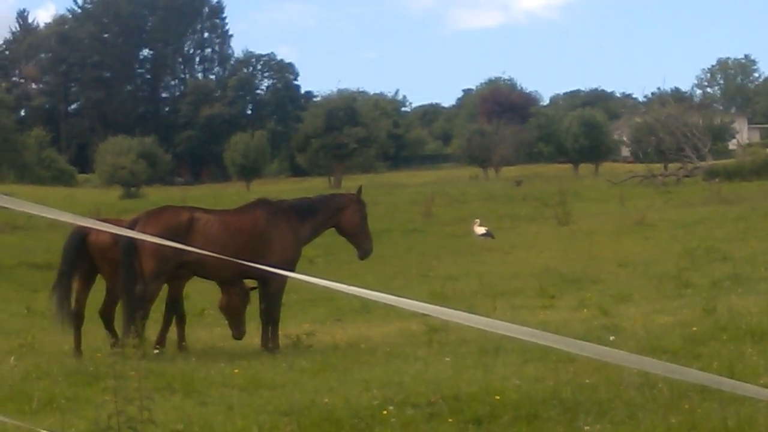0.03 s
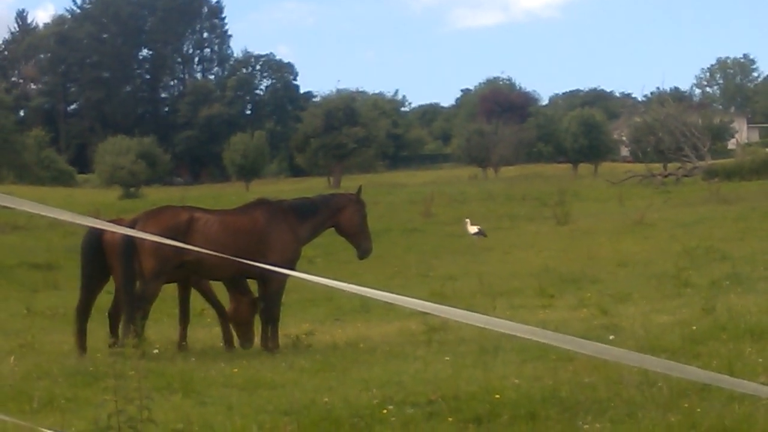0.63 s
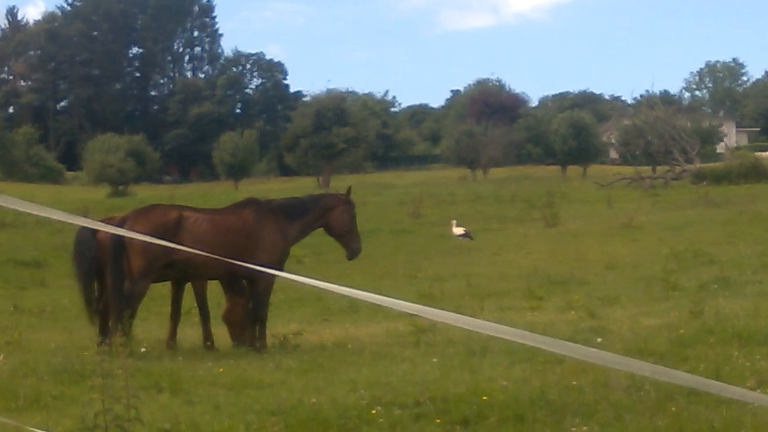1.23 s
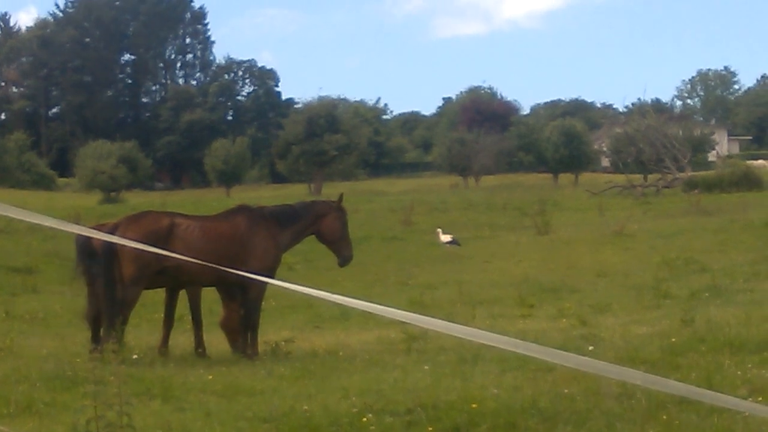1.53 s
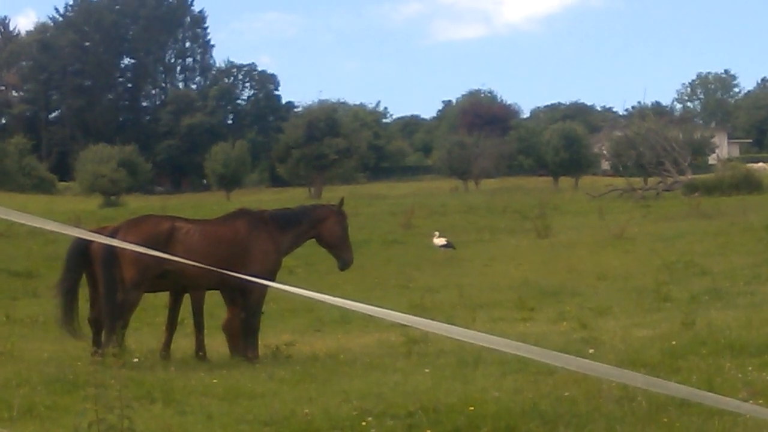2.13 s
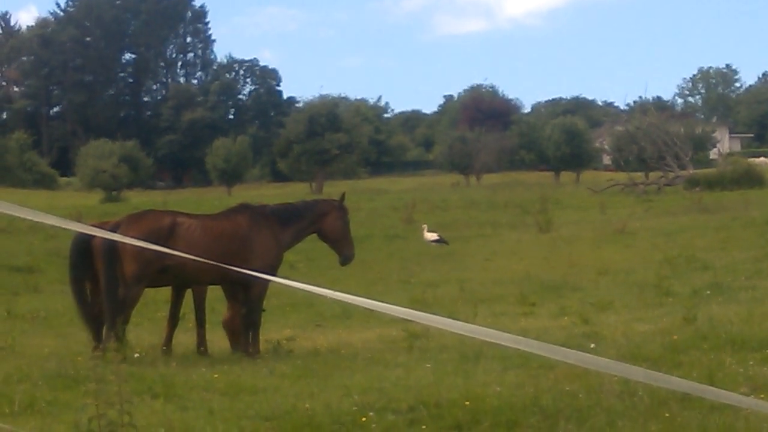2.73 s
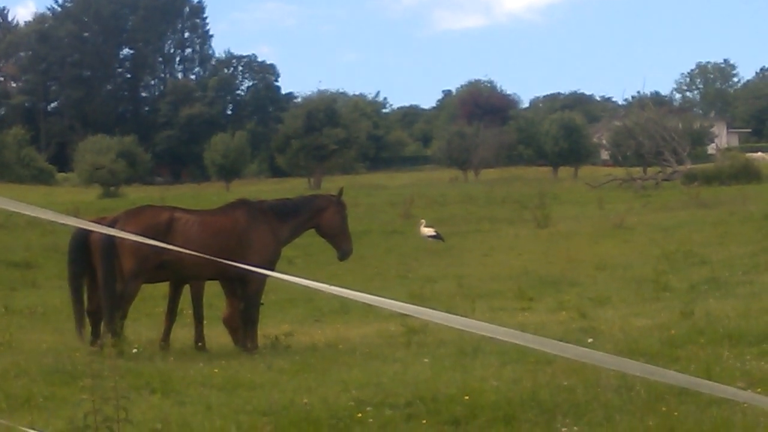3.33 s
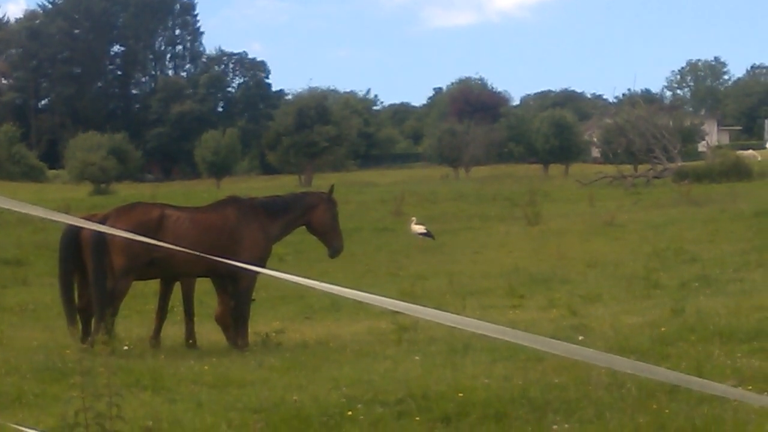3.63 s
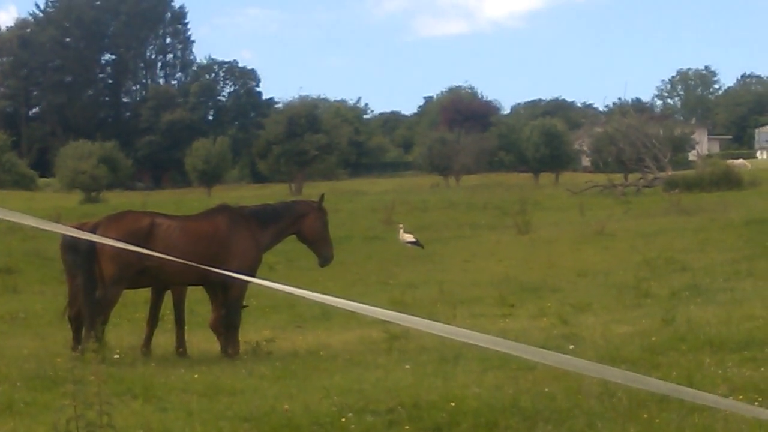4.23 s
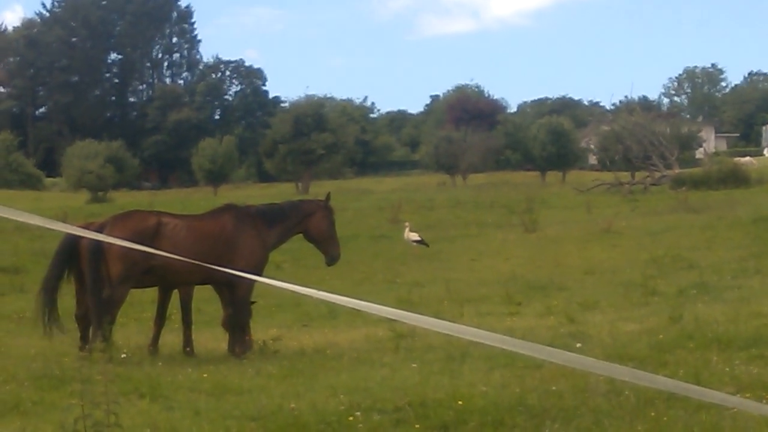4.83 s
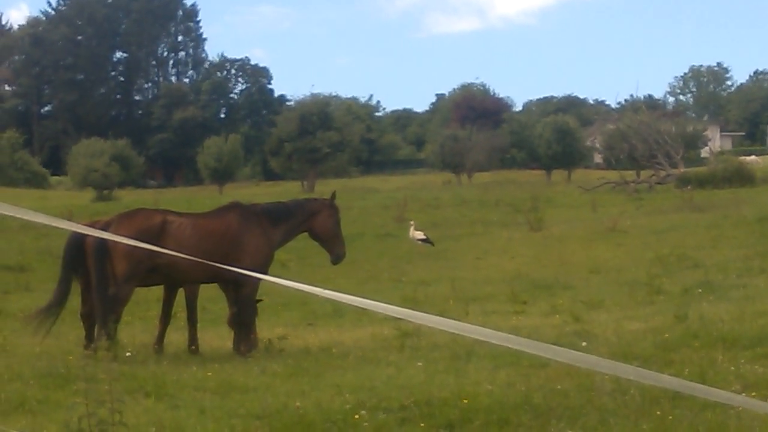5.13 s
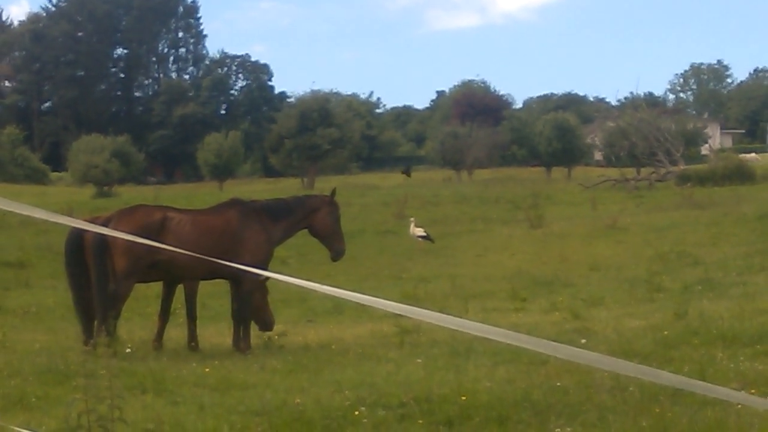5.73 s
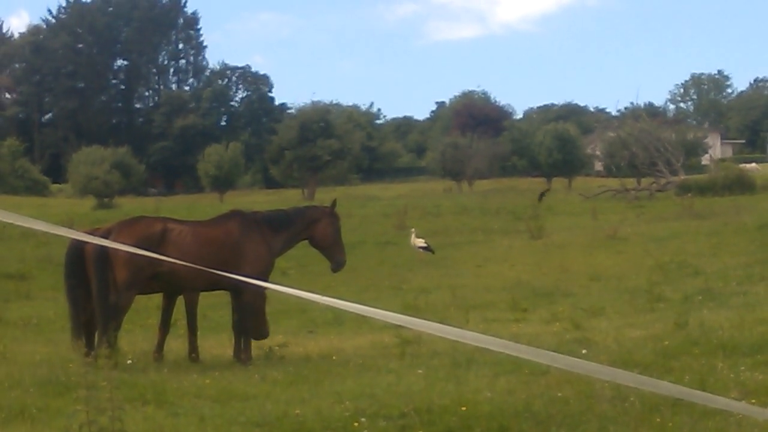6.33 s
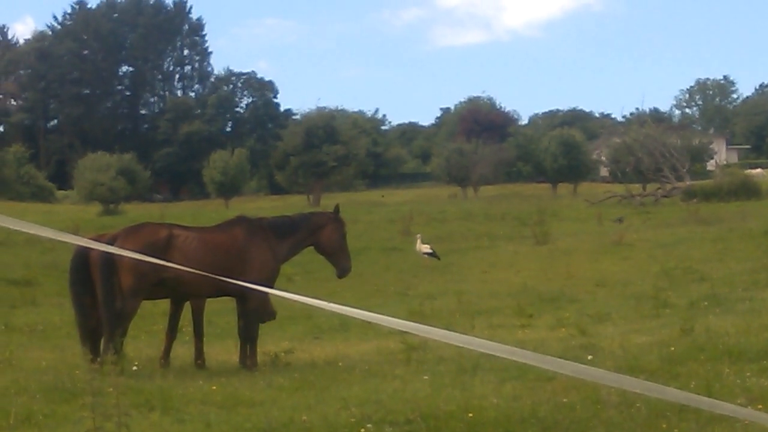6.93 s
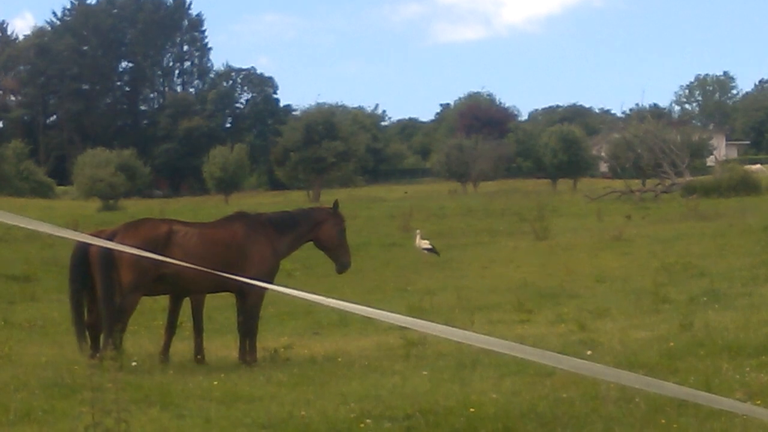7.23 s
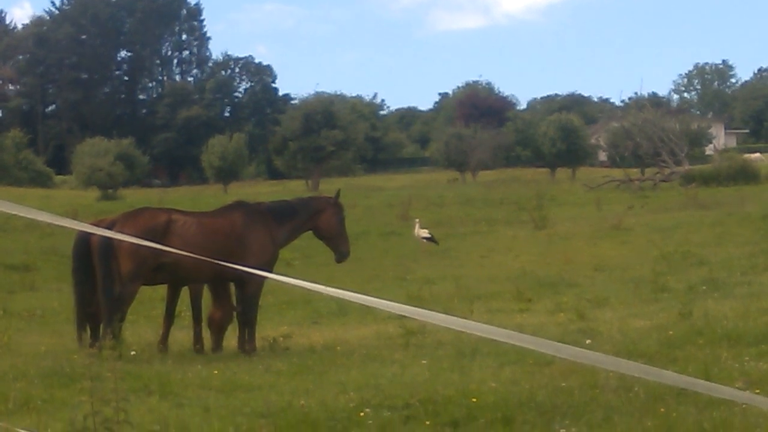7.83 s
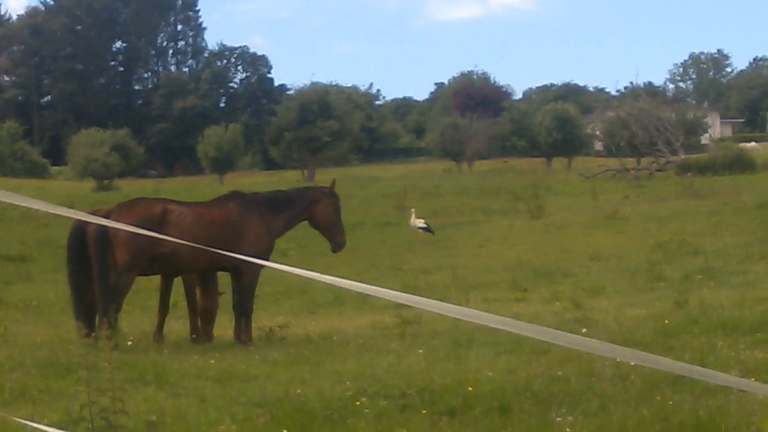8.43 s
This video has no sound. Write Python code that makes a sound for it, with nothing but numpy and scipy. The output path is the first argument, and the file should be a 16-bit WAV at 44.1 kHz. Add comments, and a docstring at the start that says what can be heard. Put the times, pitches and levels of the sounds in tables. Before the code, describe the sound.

Rattling crow caws, repeated thin sparrow chirps and short jackdaw yelps in open countryside with a low breeze rumble.

```python
"""Birds over a quiet horse meadow

A crow gives two long rattling caws and later two short far ones: a pulsed source filtered by its throat.
A sparrow repeats three kinds of falling, nearly pure chirp, jackdaws yelp, once with a rough tail, and
small birds twitter far off; ground and foliage scatter each call. Light wind and handling bump the
microphone and dry stems snap, over a distant engine's drone and the noise of grass, leaves and open air."""
import sys
import numpy as np
from scipy import signal
from scipy.fft import rfft, irfft, next_fast_len
from scipy.io import wavfile
from scipy.ndimage import uniform_filter1d, map_coordinates

SR = 44100
rng = np.random.default_rng(int(sys.argv[2]) if len(sys.argv) > 2 else 0)


def store_wav(level_fs):
    """Save 16-bit WAV to argv[1]."""
    pcm = np.round(np.clip(np.atleast_2d(level_fs), -1, 1) * 32767)
    wavfile.write(sys.argv[1], SR, pcm.T.astype(np.int16))


N = 373527
T = np.arange(N) / SR


# Response of the throat and beak in a rattling call: frequency_hz, gain_db
RATTLE_TRACT = [(350, -41), (720, -13.5), (900, -13), (1100, -0.5), (1350, 3), (1900, 0.5), (2230, 2.5),
                (2370, -9), (2750, -25.5), (3300, -20), (6000, -54), (9000, -58)]
# Four crow caws and, at 7.17 s, the rough tail of a jackdaw's yelp; one formant moves as the beak closes:
# start_s, length_s, top_pitch_hz, level_db, crest_fraction, open_formant_hz, closed_formant_hz,
# formant_db, tilt_db_per_octave
RATTLING_CALLS = [(-.045, .515, 387.4, -54.5, .3, 1925, 1345, 4, -1),
                  (1.052, .477, 383, -53.5, 0.32, 1549, 1617, 5, 0),
                  (7.166, 0.1246, 345.9, -62, .25, 1920, 1540, 1.5, -3),
                  (7.677, 0.17, 329, -59.5, .47, 1622, 1410, 13.5, -16.5),
                  (8.253, 0.181, 324.5, -63.5, 0.46, 1588, 1460, 8.5, -8)]

def rattling_calls(rattle_hz=54.206, sweep=.1735, throb_db=2, rasp=.42):
    """Source and filter: the syrinx buzzes in rapid, uneven bursts, and the throat shapes the harmonics."""
    out = np.zeros(N)
    for start, length, top_hz, level_db, crest, open_hz, closed_hz, formant_db, tilt_db in RATTLING_CALLS:
        t, progress = span(start, length)
        # Effort slackens on both sides of the crest: pitch and level drop, and the throat rings more.
        slack = np.abs((progress - crest) / (1 - crest)) ** 1.4
        pitch_hz = top_hz * (1 - .26 * slack)
        # Within each burst the pitch slides up and the level swells.
        burst = np.cumsum(rattle_hz * (1 + .1808 * drift(49.23, t))) / SR % 1
        phase = phase_of(pitch_hz * (1 + sweep * (burst - .5) + .01996 * drift(500, t)))
        throb = from_db(-throb_db * np.cos(2 * np.pi * burst))
        tract = [(hz, db + tilt_db * np.log2(hz / open_hz)) for hz, db in RATTLE_TRACT]
        buzz = sum(gain_at(tract, k * pitch_hz) * np.sin(k * phase + rng.uniform(0, 2 * np.pi))
                   for k in range(1, 20))
        breath = noise(tract, len(t)) * (1 + .604 * np.cos(phase))
        voice = (rms_one(buzz) + rasp * breath) * throb
        formant_hz = open_hz + (closed_hz - open_hz) * progress ** 3.03
        voice += from_db(formant_db + 22 * slack) * resonance(voice, formant_hz, half_width_hz=112.2)
        voice /= np.sqrt(uniform_filter1d(voice ** 2, size=1800))  # hold the short-term rms at 1
        gain = from_db(level_db - 9.5 * slack + 1.1 * drift(19.56, t))
        add(out, t, voice * gain * envelope(progress, rise=.0268 / length, fall=.0486 / length))
    return scatter(out, wet_db=-7.5, t60_s=.099)


# Notes of three syllables, each ending in a soft afternote:
# delay_s, length_s, entry_hz, held_hz, exit_hz, relative_db, swell_db
CHEEP_NOTES = [(0, .088, 6930, 3873, 3402, -2.12, 13.5), (.127, 0.03, 4612, 4025, 3924, -14.5, 13)]
CHIRP_NOTES = [(0, .095, 6700, 4608, 3697, -9.5, 9.7), (.127, .024, 5150, 4245, 3945, -17, 8.6)]
CHILP_NOTES = [(0, 0.044, 7010, 5206, 4604, -5.5, 2.42), (.042, 0.0606, 4818, 3354, 3346, -6.5, 0.93),
               (.146, 0.019, 4200, 4080, 3920, -9, 6.5)]
# When each syllable is sung: start_s, level_db
CHEEP_ONSETS = [(.115, -76.5), (0.903, -64), (1.658, -65.5), (3.435, -64), (4.552, -61), (5.583, -60.5)]
CHIRP_ONSETS = [(0.502, -66.5), (2.707, -68.5), (3.776, -59.5), (4.865, -56.5), (5.951, -61.5)]
CHILP_ONSETS = [(1.269, -71), (3.065, -74.5), (4.147, -69.5), (5.203, -66.5), (6.336, -74)]

def sparrow():
    """Multiple scattering: near foliage smears three syllables, and far trees return them faintly."""
    syllables = [(CHEEP_NOTES, CHEEP_ONSETS), (CHIRP_NOTES, CHIRP_ONSETS), (CHILP_NOTES, CHILP_ONSETS)]
    song = sum(whistles(notes, onsets, waver=.0152, flutter_db=3) for notes, onsets in syllables)
    smeared = scatter(song, wet_db=-2.5, t60_s=.161, count=1500)
    return scatter(smeared, wet_db=-20, t60_s=.35)


def whistles(notes, onsets, waver, flutter_db, swoop_s=.007):
    """Frequency modulation: a pure tone swoops to its held pitch, swells, then droops ever faster."""
    out = np.zeros(N)
    for start, level_db in onsets:
        for delay, length, entry_hz, held_hz, exit_hz, note_db, swell_db in notes:
            t, progress = span(start + delay, length)
            swoop_hz = (entry_hz - held_hz) * np.exp(-(t - t[0]) / swoop_s)
            droop_hz = (exit_hz - held_hz) * progress ** 4.2
            pitch_hz = (held_hz + swoop_hz + droop_hz) * (1 + waver * drift(350, t))
            tone = np.sqrt(2) * np.sin(phase_of(pitch_hz))
            arch_db = -swell_db * (2 * progress - 1) ** 2
            gain = from_db(level_db + note_db + arch_db + flutter_db * drift(140.5, t))
            add(out, t, tone * gain * envelope(progress, rise=.02433, fall=.1443))
    return out


# Response of the jackdaw's throat: frequency_hz, gain_db
JACKDAW_TRACT = [(750, -18), (1150, -37), (1500, -7), (2050, 3), (3000, -8.5), (3500, -27.5), (4600, -15),
                 (6500, -25.5)]
# Yelps: start_s, length_s, first_pitch_hz, last_pitch_hz, source_db, bend_exponent (over 1 falls late)
JACKDAW_YELPS = [(1.405, .05, 1500, 1180, -67.5, 2.24), (1.468, 0.063, 1490, 1040, -71.5, .9),
                 (2.3, .11, 1020, 980, -88, 1.2), (2.54, .12, 1029, 1010, -91, 0.98),
                 (2.85, .085, 1537, 1050, -73.5, 1.46), (2.925, .095, 1436, 1000, -78.5, 0.55),
                 (4.071, 0.0646, 1508, 900, -55.5, 2.9), (4.138, .06, 1508, 1110, -63, 1.13),
                 (4.143, .06, 1180, 990, -69, 0.412), (4.188, 0.0425, 1084, 980, -61.5, .7),
                 (4.711, .03, 1063, 750, -70, 1), (4.74, .08, 1110, 955, -75.5, .5),
                 (7.17, .03, 1241, 690, -66.5, 1.4)]

def jackdaws(waver=.031, upper_harmonics_db=-12):
    """Formant filtering: the throat favours the second harmonic of each short falling yelp."""
    out = np.zeros(N)
    for start, length, first_hz, last_hz, source_db, bend in JACKDAW_YELPS:
        t, progress = span(start, length)
        pitch_hz = first_hz + (last_hz - first_hz) * progress ** bend
        phase = phase_of(pitch_hz * (1 + waver * drift(400, t)))
        voice = sum(gain_at(JACKDAW_TRACT, k * pitch_hz) * from_db(db) * np.sin(k * phase)
                    for k, db in [(1, 0), (2, 0), (3, upper_harmonics_db), (4, upper_harmonics_db)])
        add(out, t, np.sqrt(2) * voice * from_db(source_db) * envelope(progress, rise=.186, fall=.252))
    return scatter(out, wet_db=-8.5, t60_s=.298)


# Runs of notes from far small birds: start_s, end_s, pitch_hz, direct_level_db
TWITTER_RUNS = [(2.349, 2.46, 4250, -95), (6.7, 6.95, 4420, -101)]

def far_birds(notes_per_s=30, note_s=.022, glide=.12):
    """Reverberant field: tiny falling notes arrive mostly as echoes, stronger than the direct sound."""
    out = np.zeros(N)
    for start, end, centre_hz, level_db in TWITTER_RUNS:
        for beat in np.arange(start, end, 1 / notes_per_s):
            hz = centre_hz * rng.normal(1, .08)
            note = (0, note_s, hz * (1 + glide), hz, hz * (1 - glide), 0, 6)
            onset = (beat + rng.uniform(0, .018), level_db)
            out += whistles([note], [onset], waver=.017, flutter_db=5)
    return scatter(out, wet_db=10.5, t60_s=.28)


# Gusts that rock the microphone: time_s, peak_db, swell_s
WIND_GUSTS = [(0.149, -43.5, .016), (.745, -40.5, 0.0446), (1.144, -33, 0.011), (1.173, -30, 0.012),
              (1.257, -35.5, .015), (2.67, -45, .025), (3.487, -35, .017), (4.018, -37, .024),
              (6.56, -40, .014), (6.82, -41.5, .045), (7.15, -41, .015), (7.475, -40.5, .012),
              (7.75, -33, 0.0098), (7.82, -35, .027), (7.965, -38.5, .02)]
# Handling knocks: time_s, peak_db, tilt_db_per_octave
HANDLING_KNOCKS = [(3.992, -34.5, -5.5), (7.638, -25, -0.5), (7.673, -34.5, -2.5)]
# Modes of the microphone housing: frequency_hz, relative_db, swell_s
HOUSING_MODES = [(97.53, 0, .012), (187.5, -6, .005), (289.67, -8, .006)]

def microphone_bumps(rock_hz=57.4, sag=.1294, turbulence_db=-16):
    """Transient excitation: gusts rock the microphone and knocks drive the modes of its housing."""
    nudges = [(time, peak_db, rock_hz, swell) for time, peak_db, swell in WIND_GUSTS]
    for time, peak_db, tilt_db in HANDLING_KNOCKS:
        for hz, mode_db, swell in HOUSING_MODES:
            octaves = np.log2(hz / HOUSING_MODES[0][0])
            nudges.append((time, peak_db + mode_db + tilt_db * octaves, hz, swell))
    return rocking(nudges, sag, turbulence_db)


# Spectrum of a puff of turbulence: frequency_hz, relative_db
PUFF_SPECTRUM = [(30, 6.5), (70, -16), (130, 7.5), (180, -4.5), (260, -18), (400, -23.5), (800, -32.5)]

def rocking(nudges, sag, turbulence_db):
    """Damped oscillation: a few low cycles swell, then slow as they fade, inside a puff of turbulence."""
    out = np.zeros(N)
    for time, peak_db, hz, swell in nudges:
        t, progress = span(time - 4 * swell, 10 * swell)
        age = (t - time) / swell
        phase = phase_of(hz * (1 - sag * np.tanh(age) + .2336 * drift(2 * hz, t)))
        sway = np.sin(phase + rng.uniform(0, 2 * np.pi))
        puff = from_db(turbulence_db) * noise(PUFF_SPECTRUM, len(t))
        pulse = envelope(progress, rise=.1, fall=.1) / np.cosh(1.202 * age)
        add(out, t, from_db(peak_db) * (sway + puff) * pulse)
    return out


# Dry stems snapping: start_s, level_db, pitch_hz, decay_s
STEM_SNAPS = [(1.193, -81, 6000, 0.00096), (1.252, -69, 3700, 0.0032), (7.383, -71.5, 10300, 0.0037),
              (7.464, -64.5, 3220, 0.0043), (7.509, -80, 11500, 0.082)]

def dry_stems(half_width=.041):
    """Exponential decay: each snap is a tiny burst of noise in a band around one pitch."""
    out = np.zeros(N)
    for start, level_db, hz, decay in STEM_SNAPS:
        t, _ = span(start, 10 * decay)
        band = [(hz / 2, -24), (hz * (1 - half_width), 0), (hz * (1 + half_width), 0), (hz * 2, -24)]
        add(out, t, from_db(level_db) * noise(band, len(t)) * np.exp(-(t - t[0]) / decay))
    return out


# Course of the distant engine: time_s, firing_rate_hz, level_db
ENGINE_COURSE = [(0, 90.67, -88), (2.5, 88.23, -77), (4.3, 88.31, -70.5), (5.4, 88.67, -72.5),
                 (6.1, 87.83, -67), (6.6, 88.66, -70.5), (7.1, 87.52, -66.5), (7.4, 86.58, -71.5),
                 (8.47, 87.5, -70.5)]
# Its harmonics: multiple, relative_db
ENGINE_HARMONICS = [(2, -4.5), (3, -3.5), (4, -5), (5, -10), (6, -22), (7, -14)]

def engine(wobble=.01445, fading_db=4):
    """Harmonic series: low multiples of the firing rate each fade in and out on the breeze."""
    firing_hz, level_db = in_time(ENGINE_COURSE)
    phase = phase_of(firing_hz * (1 + wobble * drift(16)))
    return sum(np.sin(k * phase) * from_db(level_db + db + fading_db * drift(14))
               for k, db in ENGINE_HARMONICS)


# Strength of the breeze at the microphone: time_s, relative_db
BREEZE_COURSE = [(0.0, -63.5), (1.51, -62.5), (1.91, -65.5), (2.12, -59), (2.57, -65.5), (3.39, -54),
                 (4.79, -57), (5.28, -54.5), (6.27, -58.5), (6.82, -53), (7.19, -59), (7.81, -50),
                 (8.19, -57), (8.47, -54.5)]
# Spectrum of its rumble: frequency_hz, relative_db
RUMBLE_SPECTRUM = [(15, -14.5), (28, -3.5), (42, -4.5), (53, 4.5), (66, -7.5), (85, -11.5), (115, -15.5),
                   (150, -22.5), (220, -32.5)]

def wind(limit_db=-52, gain_db=5.5, lumps_db=3.91):
    """Turbulent pressure: the breeze on the microphone makes a low, lumpy rumble."""
    breeze_db, = in_time(BREEZE_COURSE)
    return noise(RUMBLE_SPECTRUM) * from_db(np.minimum(breeze_db, limit_db) + gain_db + lumps_db * drift(16))


# Swishes of grass: time_s, peak_db, swell_s
GRASS_SWISHES = [(.17, -85.5, 0.2), (5.52, -81.5, 0.096), (5.85, -89.5, 0.059), (7.96, -77.5, 0.115)]
# Their spectrum: frequency_hz, relative_db
GRASS_SPECTRUM = [(5000, -9.5), (7500, -20.5), (8700, -11.5), (10500, -12), (12000, -20), (15000, -55.5)]

def grass(flicker_db=1.5):
    """Amplitude modulation: high, flickering noise swells and fades with each swish."""
    swishes = sum(from_db(db) / np.cosh((T - time) / swell) for time, db, swell in GRASS_SWISHES)
    return noise(GRASS_SPECTRUM) * from_db(flicker_db * drift(25)) * swishes


# Course of the open air: time_s, murmur_relative_db, hiss_relative_db
AIR_COURSE = [(0.0, -78.5, -97.5), (0.42, -79.5, -94), (3.21, -79, -91.5), (3.63, -76.5, -93),
              (8.0, -71, -89), (8.47, -72.5, -87)]
# Spectra of its murmur, far leaves and hiss: frequency_hz, relative_db
MURMUR_SPECTRUM = [(90, -18.5), (180, 0.5), (290, 0), (420, -8), (640, -8), (900, -15.5), (1800, -20),
                   (2600, -24), (5000, -28.5)]
LEAF_SPECTRUM = [(900, 4), (2000, 2.5), (3000, -6.5), (4500, -1), (5900, -2), (7500, -10.5), (11000, -27)]
HISS_SPECTRUM = [(3000, -16), (7000, -2), (10000, 0.5), (13000, 1.5), (15700, -0.5)]

def open_air(murmur_gain_db=5.5, leaves_db=-82, hiss_gain_db=4):
    """Incoherent addition: a low murmur, far leaves and hiss sum to a nearly steady noise floor."""
    murmur_db, hiss_db = in_time(AIR_COURSE)
    murmur = noise(MURMUR_SPECTRUM) * from_db(murmur_db + murmur_gain_db + .38 * drift(12))
    leaves = noise(LEAF_SPECTRUM) * from_db(leaves_db + .2 * drift(3.644))
    hiss = noise(HISS_SPECTRUM) * from_db(hiss_db + hiss_gain_db + .21 * drift(21))
    return murmur + leaves + hiss


def scatter(x, wet_db, t60_s, count=300):
    """Convolution: many weak reflections from ground, hedges and leaves follow the direct sound."""
    delay_s = rng.uniform(.003, .35, count)
    echoes = np.zeros(SR)
    echoes[(delay_s * SR).astype(int)] = rng.standard_normal(count) * from_db(-60 * delay_s / t60_s)
    return x + from_db(wet_db) * signal.fftconvolve(x, echoes / np.linalg.norm(echoes))[:N]


def resonance(x, centre_hz, half_width_hz):
    """Heterodyne band-pass: shift the moving centre to zero, smooth, shift back."""
    carrier = np.exp(1j * phase_of(centre_hz))
    low_pass = signal.butter(1, half_width_hz, fs=SR, output="sos")
    return 2 * np.real(signal.sosfiltfilt(low_pass, x / carrier, padtype=None) * carrier)


def noise(spectrum, size=N):
    """Spectral shaping: noise of rms 1 that falls 12 dB an octave beyond the spectrum's ends."""
    padded = next_fast_len(size)
    hz = np.arange(padded // 2 + 1) * SR / padded
    skirts = np.minimum(1, hz / spectrum[0][0]) ** 2 / np.maximum(1, hz / spectrum[-1][0]) ** 2
    white = rfft(rng.standard_normal(padded))
    return rms_one(irfft(white * gain_at(spectrum, hz) * skirts, padded))[:size]


def gain_at(spectrum, hz):
    """Frequency response, interpolated on a logarithmic axis."""
    points_hz, db = np.transpose(spectrum)
    return from_db(np.interp(np.log(hz + 1e-9), np.log(points_hz), db))


def drift(rate_hz, t=T):
    """Random modulation: a smooth curve through rate_hz chance values a second, spread near 1."""
    steps = (t - t[0]) * rate_hz
    return map_coordinates(rng.standard_normal(int(steps[-1]) + 3), [steps], order=2, mode="mirror")


def phase_of(hz):
    """Phase in radians, the time integral of frequency."""
    return 2 * np.pi * np.cumsum(hz) / SR


def from_db(db):
    """Amplitude ratio of a level in decibels."""
    return 10 ** (np.asarray(db) / 20)


def rms_one(x):
    """Normalisation to unit power."""
    return x / np.sqrt(np.mean(x ** 2) + 1e-20)


def in_time(rows):
    """Linear interpolation of a table's columns at every sample."""
    times, *columns = np.transpose(rows)
    return [np.interp(T, times, column) for column in columns]


def span(start, length):
    """Sample times of one sound and its progress from 0 to 1."""
    t = np.arange(max(0, int(start * SR)), min(N, int((start + length) * SR))) / SR
    return t, np.clip((t - start) / length, 0, 1)


def envelope(progress, rise, fall):
    """Trapezoidal envelope; rise and fall are fractions of the sound's length."""
    return np.clip(np.minimum(progress / rise, (1 - progress) / fall), 0, 1)


def add(out, t, sound):
    """Superposition of a sound at its time."""
    start = round(t[0] * SR)
    out[start:start + len(sound)] += sound


def scene():
    """Superposition: the birds and their background sum at one microphone."""
    birds = rattling_calls() + sparrow() + jackdaws() + far_birds()
    return (birds + microphone_bumps() + dry_stems() + engine() + wind() + grass() + open_air())[None]


def record(dry, fade_in_s=.004, cutoff_hz=15740):
    """Band limiting: the sound eases in and a steep low-pass cuts the top."""
    eased = dry * np.minimum(1, T / fade_in_s)
    return signal.fftconvolve(eased, signal.firwin(511, cutoff_hz, fs=SR)[None], mode="same")


dry = scene()
out = record(dry)
store_wav(out)
```